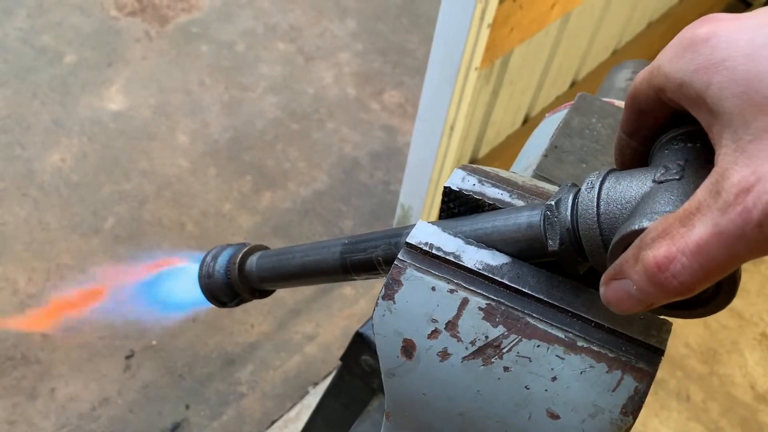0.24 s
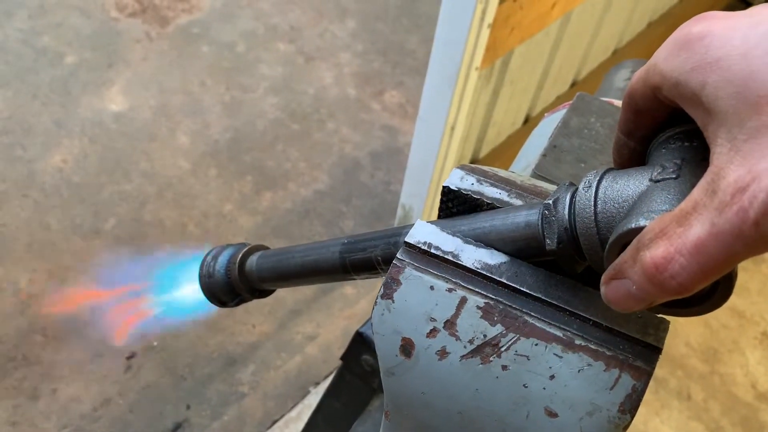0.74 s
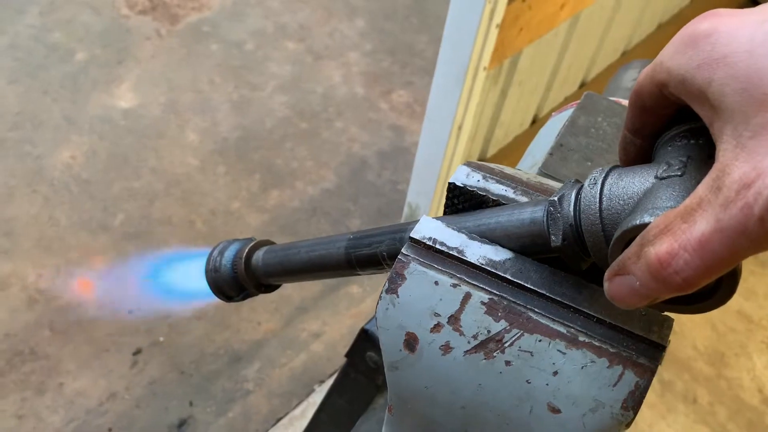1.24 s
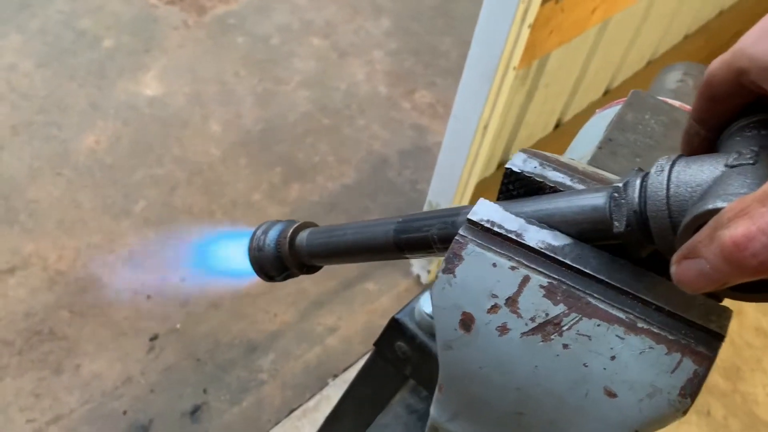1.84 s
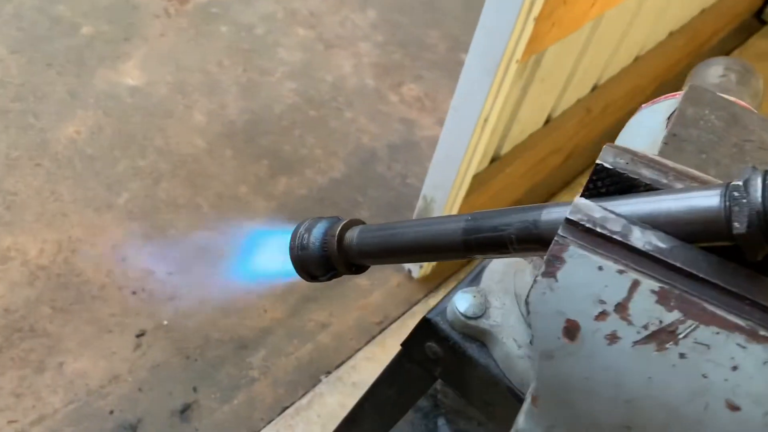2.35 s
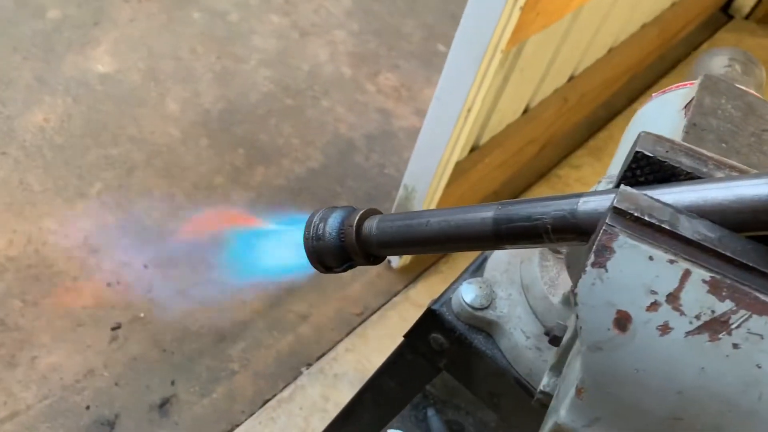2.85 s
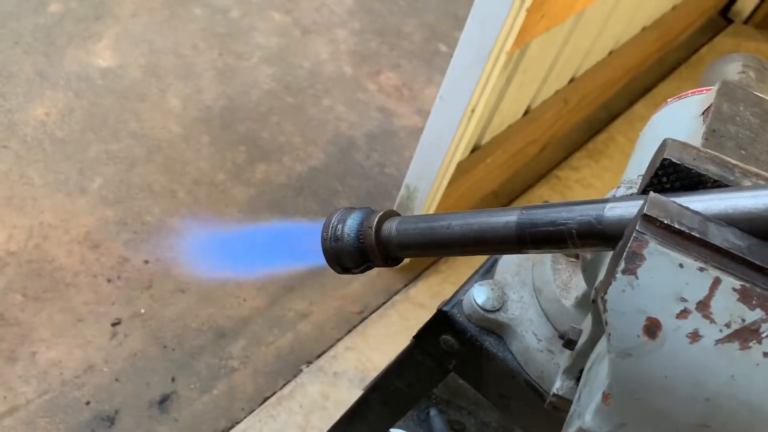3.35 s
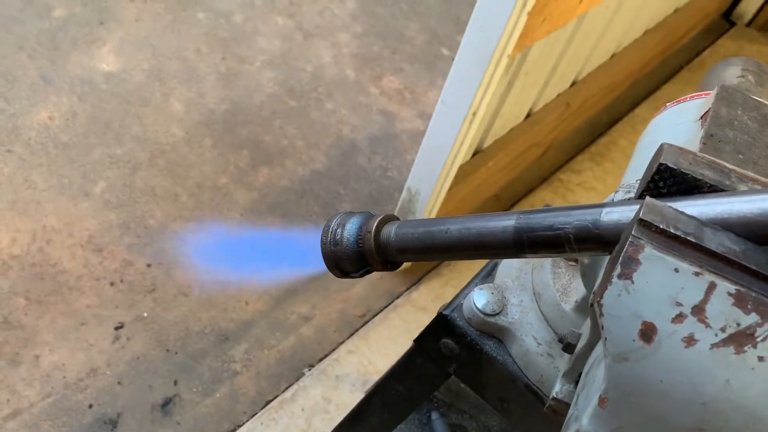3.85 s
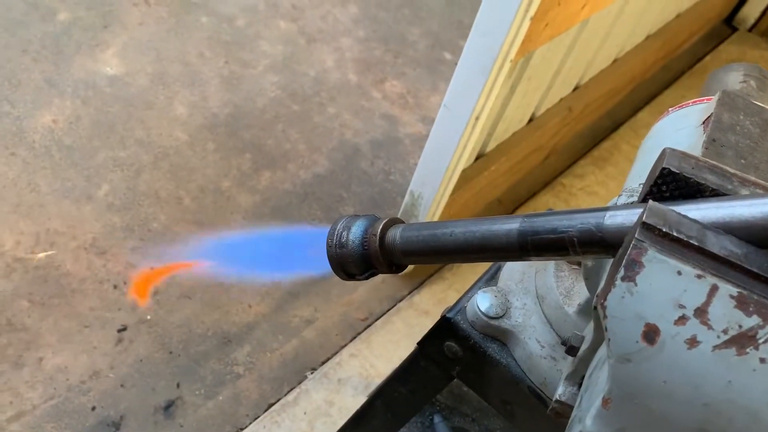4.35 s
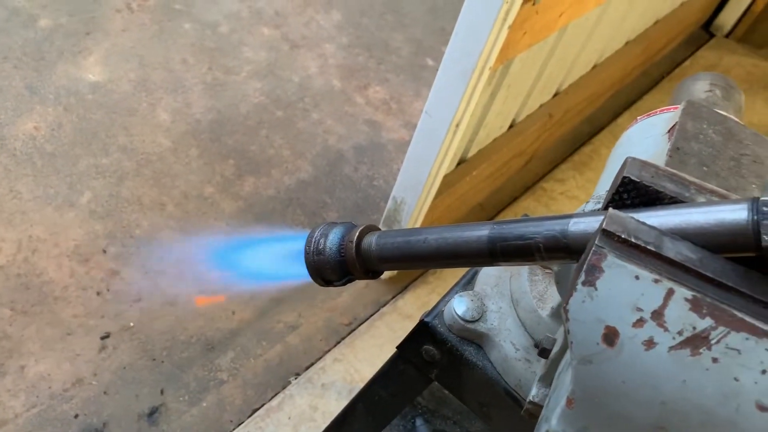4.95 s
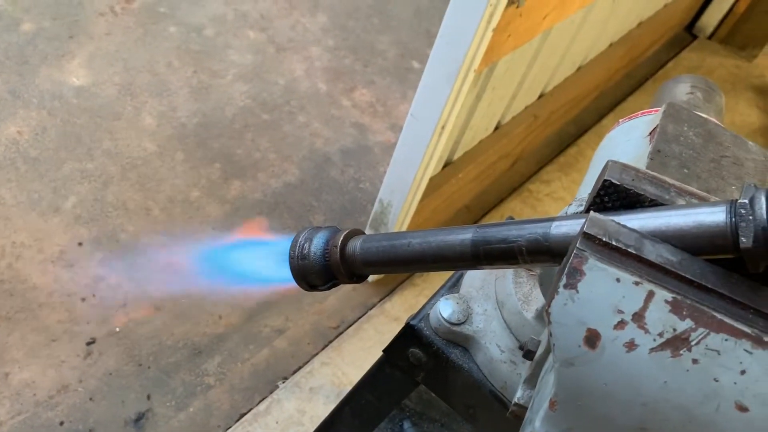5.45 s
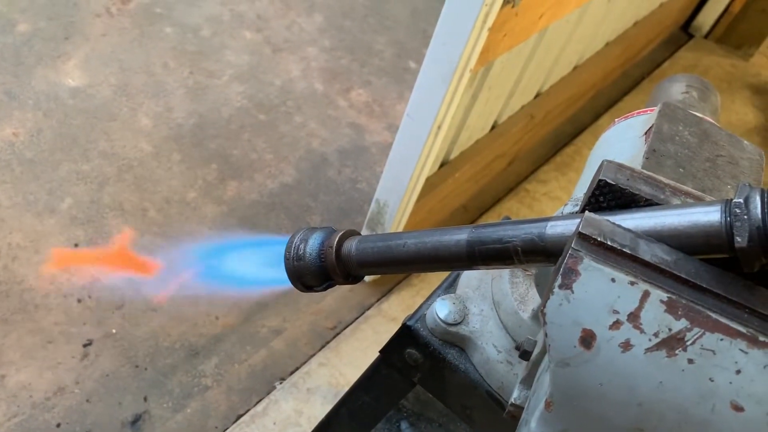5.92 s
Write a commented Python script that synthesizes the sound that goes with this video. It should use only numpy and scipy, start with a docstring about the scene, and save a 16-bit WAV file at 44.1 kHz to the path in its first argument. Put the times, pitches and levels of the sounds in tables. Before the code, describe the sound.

The burner is already at full blast from 0 s: a thick low roar centred around 200 Hz, a hollow breathy ringing of the steel pipe, thin whistly bands of intake air, and a sharp high hiss from the gas jet, leaning right. Small soft puffs bump the roar at about 0.3, 0.6, 0.75 and 1.0-1.1 s, then at 1.6 s. From 1.5 to 3 s the close microphone moves from vise to nozzle; the tone shifts, the intake whistle slides down and the hiss brightens, with stronger puffs clustered at 2.0-2.8 s, the biggest near 2.3 s. At about 3.1 s the intake whistle fades and a deep, rapid rumbling flutter swells, lasting to roughly 4.5 s. It eases by 5 s, the hiss changing colour, and a steadier roar runs on to the end at 6.2 s, uncut. Dry, near, dense.

```python
"""Propane pipe burner in a vise

The flame roars, rumbles and puffs as coloured noise and short pulses; the pipe rings as resonant noise.
Air rushes into the intake and rings it in gliding narrow bands, at first shaded by a hand.
The gas jet hisses to the right and sings in bands of noise; mid-scene the flame flutters deeply.
The listening point moves from the vise to the nozzle, which fades and re-levels the layers.
"""
import sys
import numpy as np
from scipy import signal
from scipy.fft import rfft, irfft, next_fast_len
from scipy.io import wavfile
from scipy.ndimage import uniform_filter1d, map_coordinates

SR = 44100
rng = np.random.default_rng(int(sys.argv[2]) if len(sys.argv) > 2 else 0)


def transcribe(signal):
    """Save signal, clipped to [-1, 1], as a 16-bit WAV file at the path in sys.argv[1]."""
    frames = np.atleast_2d(signal).T
    limited = np.clip(frames, -1, 1)
    pcm = np.round(limited * 32767).astype(np.int16)
    wavfile.write(sys.argv[1], SR, pcm)


N = 272538

# listening point: (time [s], place [0 by the vise .. 1 by the nozzle])
LISTENING_PLACE = [(0, 0), (1.5, 0.051), (2.1, 0.49), (2.9, 0.88), (6.18, 0.99)]
# unsteadiness of the flame: (time [s], unrest [0 calm .. 1 full flutter])
FLAME_UNREST = [(0, 0), (1.8, 0.21), (2.35, 0.0055), (3.08, 0.55), (3.14, 0.89), (4.45, 0.9), (4.8, 0.66),
                (4.87, 0.44), (5.05, 0.09), (6.18, 0)]
# stereo pickup at each place: (frequency [Hz], likeness [0-1], phase by which left leads [rad], L-R [dB])
EARS_BY_VISE = [(90, 0.99, 0.12, 0.2), (430, 1, 0.2, 0), (730, 0.93, 0.5, -1.7), (1120, 0.8, -0.6, 6),
                (1290, 0.84, -0.4, 2), (1510, 0.7, 0.4, 2.5), (1630, 0.5, 1.5, 3), (2620, 0.97, 3, 0.7),
                (2930, 0.5, 3.5, 6), (3080, 0.2, 4, 1.4), (3350, 0.4, 5, -7), (3530, 0.85, 5.5, 6),
                (3830, 0.4, 5.5, 2), (4950, 0.68, 6.2, -5), (5040, 0.78, 5.5, -4), (6200, 0.31, 3.5, -5),
                (6290, 0.18, 7.5, -2.6), (6890, 0.61, 0.5, -2), (7280, 0.38, 4, 0.3)]
EARS_BY_NOZZLE = [(90, 0.98, 0.05, -0.6), (470, 1, 0.03, 0.0), (600, 0.93, 0.45, -0.5),
                  (950, 0.85, -0.1, 1.7), (1480, 0.67, -0.2, 5.5), (1760, 0.27, 2.6, 8.5),
                  (1950, 0.4, 2.1, 5.5), (2150, 0.66, 2.5, 2.5), (2810, 0.77, 2.5, 1.6),
                  (2980, 0.22, 3.0, -1.5), (3160, 0.95, 3.5, 0.7), (4220, 0.87, 2.5, -3),
                  (4440, 0.36, 1.3, -8), (4840, 0.67, 2, -4), (5430, 0.08, 1.7, -3.5),
                  (5680, 0.37, -0.5, -6), (6290, 0.38, -1.5, -2.1), (6900, 0.15, -1, -0.1),
                  (7280, 0.7, 2, 0.2)]


def amp(db):
    """Decibels to gain."""
    return 10 ** (np.asarray(db) / 20)


def unit(x):
    """Scaled to rms 1."""
    return x / np.sqrt(np.mean(x ** 2) + 1e-20)


def along(points, hz, axis=1):
    """One column of a table by frequency, read on a log axis."""
    table = np.transpose(points)
    return np.interp(np.log(hz + 1), np.log(table[0] + 1), table[axis])


def curves(rows):
    """One value per sample for each column after the time."""
    time_s, *columns = np.transpose(rows)
    return [np.interp(np.arange(N) / SR, time_s, column) for column in columns]


def wobble(rate_hz):
    """Smooth random curve with rate_hz knots a second."""
    knots = rng.standard_normal(int(N * rate_hz / SR) + 4)
    return map_coordinates(knots, [np.arange(N) * rate_hz / SR])


def envelope(start_s, end_s, attack_s, release_s):
    """Attack, hold and release, with the ramps centred on start and end."""
    t = np.arange(N) / SR
    rise = np.clip(.5 + (t - start_s) / attack_s, 0, 1)
    fall = np.clip(.5 + (end_s - t) / release_s, 0, 1)
    return rise * fall


def bumps(rows, half_s):
    """Gaussian level changes in dB, one per (s, dB) row; half_s is the half-width at 1/e."""
    t = np.arange(N) / SR
    return sum(db * np.exp(-np.minimum(((t - s) / half_s) ** 2, 20)) for s, db in rows)


def level(rule, bend=1, place_bend=1):
    """Level in dB from place and unrest; a bend under 1 answers already to a slight change."""
    calm_db, nozzle_db, flutter_db = rule
    place = np.maximum(curves(LISTENING_PLACE)[0], 0)
    unrest = np.maximum(curves(FLAME_UNREST)[0], 0)
    return calm_db + nozzle_db * place ** place_bend + flutter_db * unrest ** bend


def filtered(x, response):
    """x times a response of frequency."""
    size = next_fast_len(N + 8192)
    return irfft(rfft(x, size) * response(np.fft.rfftfreq(size, 1 / SR)), size)[..., :N]


def noise(colour):
    """Coloured mono noise of rms 1."""
    return unit(filtered(rng.standard_normal(N), colour))


def heard(colour, ears):
    """Coloured stereo noise of rms 1 with the likeness, phase and balance of a pickup table."""
    turn = lambda hz: np.arccos(np.clip(along(ears, hz), 0, 1)) / 2
    spread = lambda hz: colour(hz) * [np.cos(turn(hz)), np.sin(turn(hz))]
    mid, side = filtered(rng.standard_normal((2, N)), spread)
    half = np.array([[.5], [-.5]])
    lean = lambda hz: np.exp(1j * half * along(ears, hz, axis=2)) * amp(half * along(ears, hz, axis=3))
    return unit(filtered(np.array([mid + side, mid - side]), lean))


def between_places(by_vise, by_nozzle):
    """Equal-power fade between two views of a sound as the listening point moves."""
    place = np.clip(curves(LISTENING_PLACE)[0], 0, 1)
    return np.sqrt(1 - place) * by_vise + np.sqrt(place) * by_nozzle


def steadied(x, seconds):
    """Evens out the slow swells of a noise and keeps its fast flutter."""
    power = np.mean(np.atleast_2d(x) ** 2, axis=0)
    return x / np.sqrt(np.abs(uniform_filter1d(power, max(int(seconds * SR), 2))) + 1e-9)


def patchy(x, depth_db, bands_size, time_size):
    """Eddies colour a noise with drifting patches of gain; sizes in STFT bins and frames."""
    spectrum = signal.stft(x, nperseg=512)[2]
    field = rng.standard_normal(spectrum.shape[-2:])
    field = uniform_filter1d(field, size=bands_size, axis=0)
    field = uniform_filter1d(field, size=time_size, axis=1)
    return unit(signal.istft(spectrum * amp(depth_db * unit(field)), nperseg=512)[1][..., :N])


def flame(flicker):
    """Turbulent burning roars around the pipe's lowest resonance; an unsteady flame adds rumble."""
    # (frequency [Hz], by the vise [dB per Hz, relative], by the nozzle [dB per Hz, relative])
    roar_colour = [(30, -43, -36), (103, -15, -23.5), (135.4, -8.5, -3.5), (161.6, -2, -2), (197.4, 0, 2),
                   (247.8, -4, -4.5), (309, -15.5, -16.5), (394, -12.5, -11.5), (447, -11, -11.5),
                   (463, -15, -16.5), (560, -11.5, -15), (676, -13.5, -12.5), (751, -24, -32),
                   (1120, -93, -90)]
    # (frequency [Hz], density [dB per Hz, relative])
    rumble_colour = [(15, -31), (28, -27), (42, -16.5), (60, -9), (100, -5), (140, -8), (200, -11.5),
                     (350, -64), (900, -98)]
    # base levels: (calm by the vise [dB], added by the nozzle [dB], added at full flutter [dB])
    roar_rule = (-18, 1.46, 1.5)
    rumble_rule = (-31, 0, 15)
    # brief irregular level changes of the roar, up or down: (time [s], change [dB])
    roar_changes = [(0.36, 2.5), (0.44, 4), (0.53, 1), (1.03, 2), (1.12, 0), (1.6, 4), (1.75, 3.5),
                    (1.995, 1), (2.19, 2.5), (2.32, 4), (2.42, 4), (2.56, 4), (3.72, -1), (4.12, 3),
                    (4.36, 1.5), (5.24, -1), (5.79, -2)]
    # momentary stalls of the rumble: (time [s], dip [dB])
    stalls = [(3.06, -26), (3.12, -5), (3.79, -5), (4.48, -2)]

    roar = between_places(heard(lambda hz: amp(along(roar_colour, hz, axis=1)), EARS_BY_VISE),
                          heard(lambda hz: amp(along(roar_colour, hz, axis=2)), EARS_BY_NOZZLE))
    roar_db = level(roar_rule, bend=0.3) + bumps(roar_changes, half_s=0.015) + 0.33 * flicker

    rumble = steadied(noise(lambda hz: amp(along(rumble_colour, hz))), seconds=0.061)
    # the rumble's level wanders less as the flutter grows
    rumble_db = level(rumble_rule) + (1 - curves(FLAME_UNREST)[0]) * wobble(9)
    # stronger flutter means larger eddies, so the rumble deepens as it grows
    deep = filtered(rumble, lambda hz: 1 / (1 + (hz / 65) ** 4))
    rumble = rumble + (amp(0.17 * (rumble_db + 34)) - 1) * deep
    rumble_gain = amp(rumble_db + 2.0 + bumps(stalls, half_s=0.027))
    return amp(roar_db) * steadied(roar, seconds=0.11) + rumble_gain * rumble


def resonances(modes, hz, axis=0):
    """Gain of a set of (Hz, width, dB, ..) resonances; axis picks the level column."""
    least_width_hz = 65  # the moving gas damps every resonance at least this much
    shape = lambda centre_hz, width_hz: (
        1 / (1 + (2 * (hz - centre_hz) / max(width_hz, least_width_hz)) ** 2))
    return np.sqrt(sum(amp(levels_db[axis]) ** 2 * shape(centre_hz, width_hz)
                       for centre_hz, width_hz, *levels_db in modes))


def pipe_colour(hz, axis):
    """The pipe from the vise (0) or nozzle (1), fading out below and above its resonances."""
    # burner and the space around it:
    # (frequency [Hz], width before the damping floor [Hz], by the vise [dB], by the nozzle [dB])
    pipe_modes = [(835, 34, -1, 1.5), (1090, 127, -1, 0), (1257, 27, -1, 0), (1412, 46, -1, 3.5),
                  (1606, 72, -5.5, -1.5), (1760, 80, -4, -1), (1970, 270, -7.5, -14), (2260, 88, -27, -6.5),
                  (2536, 90, -19, -4.5), (2742, 49, -7.5, -1.5), (2990, 100, -16, -12),
                  (3570, 104, -7.5, -3.5), (4044, 53, -8.5, -4), (4520, 194, -15, -10.5),
                  (4970, 84, -16, -15.5), (5210, 145, -16.5, -14), (5580, 120, -19, -15),
                  (6030, 140, -22, -17.5), (6780, 250, -20.5, -18.5)]
    limits_db = along([(400, -42), (760, 0), (7200, -0.5), (9000, -49)], hz)
    return resonances(pipe_modes, hz, axis=axis) * amp(limits_db)


def off_the_vise(x, near_s, far_s, echo_db):
    """An echo off the steel combs x; the comb slides as its path grows along the move."""
    delay_s = near_s + (far_s - near_s) * curves(LISTENING_PLACE)[0]
    late = lambda channel: map_coordinates(channel, [np.arange(N) - delay_s * SR])
    return x + amp(echo_db) * np.apply_along_axis(late, axis=-1, arr=x)


def pipe(flicker):
    """The gas and air mixture rings the pipe; its colour turns with the listening place."""
    # base levels: (calm by the vise [dB], added by the nozzle [dB], added at full flutter [dB])
    flow_rule = (-31.5, 3, 2.1)
    bright_rule = (1.33, -2, 2.26)
    rush = between_places(heard(lambda hz: pipe_colour(hz, axis=0), EARS_BY_VISE),
                          heard(lambda hz: pipe_colour(hz, axis=1), EARS_BY_NOZZLE))
    # passing eddies feed now one resonance, now its neighbour
    rush = amp(2.5) * patchy(rush, depth_db=1.6, bands_size=2, time_size=14)
    upper = filtered(rush, lambda hz: amp(along([(1500, -43), (2200, 3)], hz)))
    echoed = off_the_vise(upper, near_s=0.00103, far_s=0.001262, echo_db=-22)
    bright_db = level(bright_rule, bend=0.98) + 0.54 * wobble(35)
    flow_db = level(flow_rule, bend=1.7, place_bend=5.6) + 0.45 * flicker
    return amp(flow_db) * (rush + amp(bright_db) * echoed - upper)


def breathy_tone(pitch_hz, width_hz, lag_rad=0):
    """A narrow band of noise that follows a pitch; lag_rad shifts its phase."""
    pole = np.exp(-np.pi * abs(width_hz) / SR)
    a, b = unit(signal.lfilter([1], [1, -2 * pole, pole ** 2], rng.standard_normal((2, N))))
    phase = 2 * np.pi * np.cumsum(pitch_hz) / SR + lag_rad
    return a * np.cos(phase) + b * np.sin(phase)


def intake():
    """Air drawn into the open fitting rushes, and rings it at pitches that glide as the hand moves."""
    # rush of air: (frequency [Hz], density [dB per Hz, relative])
    draught_colour = [(1800, -25), (2700, 8), (3200, 26), (4200, -18), (4850, -6), (5500, 2), (6700, 11),
                      (7600, -15), (9000, -60)]
    # (calm by the vise [dB], added by the nozzle [dB], added at full flutter [dB])
    draught_rule = (-49, 6.5, -8)
    # (start [s], end [s], first pitch [Hz], last pitch [Hz], width of each of two poles [Hz],
    # level [dB], phase by which left lags [rad])
    intake_rings = [(-0.3, 1.3, 3280, 3230, 240, -47, 2.2), (1.15, 2.7, 3250, 2950, 380, -42, 1.9),
                    (2.1, 3, 4450, 4470, 150, -46, 2), (-0.3, 1.9, 5240, 5210, 140, -52, 0.6),
                    (1.6, 2.5, 4860, 4800, 170, -50, 2.8), (1.7, 3.15, 5210, 5200, 200, -45.5, 2.9),
                    (-0.3, 3.1, 5560, 5520, 100, -50, 1.2), (-0.3, 2.4, 7040, 6960, 130, -51, 1.8)]
    fade_s = 0.19
    draught = heard(lambda hz: amp(along(draught_colour, hz)), EARS_BY_NOZZLE)
    out = amp(level(draught_rule)) * patchy(draught, depth_db=5.0, bands_size=3, time_size=20)
    waver_hz = 32 * wobble(7)  # all pitches wander together with the draught
    for start_s, end_s, from_hz, to_hz, width_hz, db, lag_rad in intake_rings:
        pitch_hz = curves([(start_s, from_hz), (end_s, to_hz)])[0] + waver_hz
        ring = breathy_tone(pitch_hz, width_hz, lag_rad * np.array([[-.5], [.5]]))
        out = out + amp(db) * envelope(start_s, end_s, fade_s, fade_s) * ring
    return out


def singing():
    """The jet moves between breathy tones: each is a band of noise that swells, glides and dies."""
    # (start [s], end [s], first pitch [Hz], last pitch [Hz], width [Hz],
    # level before the jet's lift and flutter [dB], time to swell and to die [s])
    jet_tones = [(-0.2, 2.42, 14600, 14450, 650, -39.5, .2), (-0.2, 2.3, 13200, 13200, 450, -41.5, .3),
                 (-0.2, 2.1, 12000, 11850, 900, -41.5, .3), (0.25, 1.45, 7780, 7760, 240, -47.5, .15),
                 (2.12, 3.15, 7800, 7680, 300, -45.5, .15), (2.13, 2.32, 8900, 8800, 400, -43, .12),
                 (2.66, 2.96, 8850, 8830, 340, -41, .15), (2.7, 3.1, 10800, 10600, 550, -42.5, .15),
                 (3.1, 4.48, 7600, 7630, 180, -43, .2), (3.15, 4.44, 13760, 13760, 1200, -35.8, .14),
                 (4.22, 4.44, 12850, 12850, 750, -38.5, .08), (4.25, 4.62, 8500, 9100, 900, -42, .25),
                 (4.53, 4.82, 9000, 9350, 1000, -38.5, .2), (4.55, 6.4, 12850, 12980, 950, -38.7, .3)]
    out = np.zeros(N)
    for start_s, end_s, from_hz, to_hz, width_hz, db, fade_s in jet_tones:
        band = lambda hz: 1 / (1 + (2 * hz / width_hz) ** 4) ** .5
        pitch_hz = curves([(start_s, from_hz), (end_s, to_hz)])[0]
        phase = 2 * np.pi * np.cumsum(pitch_hz) / SR
        tone = noise(band) * np.cos(phase) + noise(band) * np.sin(phase)
        waver_db = 1.2 * wobble(9)
        out += amp(db + waver_db) * envelope(start_s, end_s, fade_s, fade_s) * tone
    return out


def jet():
    """Propane hisses out of the orifice and sings against the intake."""
    # (frequency [Hz], by the vise [dB per Hz, relative], by the nozzle [dB per Hz, relative])
    hiss_colour = [(3000, -45, -40), (6000, -13, -8), (7300, -11, -4.5), (7750, -5, -3), (8600, -4, -.5),
                   (9500, -2.5, -1), (10100, -2, -3), (10800, -3, 1), (11350, -2, -1.5), (12700, -1, -1.5),
                   (13700, -3, -3), (14400, -2, -1), (15200, -4.5, -1), (15700, -4, -2)]
    # (time [s], level before flutter [dB])
    hiss_level = [(0, -32.5), (1.2, -32), (2.2, -29), (2.45, -28), (2.55, -31.5), (2.65, -30), (2.8, -29),
                  (3.2, -30), (4.2, -30.5), (4.4, -30), (4.9, -31), (6.18, -29.5)]
    hiss = between_places(noise(lambda hz: amp(along(hiss_colour, hz, axis=1))),
                          noise(lambda hz: amp(along(hiss_colour, hz, axis=2))))
    hiss = amp(curves(hiss_level)[0]) * patchy(hiss, depth_db=1.6, bands_size=2, time_size=24)
    flutter_db = .4 * wobble(50) + .45 * wobble(25)
    return amp(flutter_db) * (hiss + singing() * amp(1.2 + 0.9 * wobble(30)))


def from_the_right(x):
    """A source to the right reaches the left channel a moment later."""
    lag_s = 0.000259
    return filtered(x, lambda hz: np.exp(2j * np.pi * lag_s * np.outer([-.5, .5], hz)))


def puffs():
    """A pocket of gas burns at once: one soft push between two pulls."""
    # (time [s], peak [dB])
    puff_peaks = [(0.268, -17), (0.412, -33), (0.61, -17), (0.648, -15), (0.76, -15), (1.02, -13),
                  (1.115, -13), (1.569, -18), (2.037, -13), (2.332, -8.5), (2.398, -15), (2.56, -15),
                  (2.692, -14.5), (2.781, -23), (5.662, -27)]
    width_s = 0.0032  # centre to zero crossing
    out = np.zeros(N)
    t = np.arange(N) / SR
    for s, db in puff_peaks:
        u = np.clip((t - s) / width_s, -10, 10)
        out += amp(db) * (1 - u ** 2) * np.exp(-u ** 2 / 2)
    return out


def scene():
    """Flame and pipe share one flicker; the jet hisses above them from the right."""
    flicker = wobble(40)
    return flame(flicker) + pipe(flicker) + intake() + from_the_right(jet()) + puffs()


def record(dry):
    """Rounds off the highest peaks and keeps nothing from the band limit up."""
    top_hz = 15780
    held = dry / (1 + np.abs(dry) ** 8) ** (1 / 8)
    return filtered(held, lambda hz: hz < top_hz)


dry = scene()
out = record(dry)
transcribe(out)
```